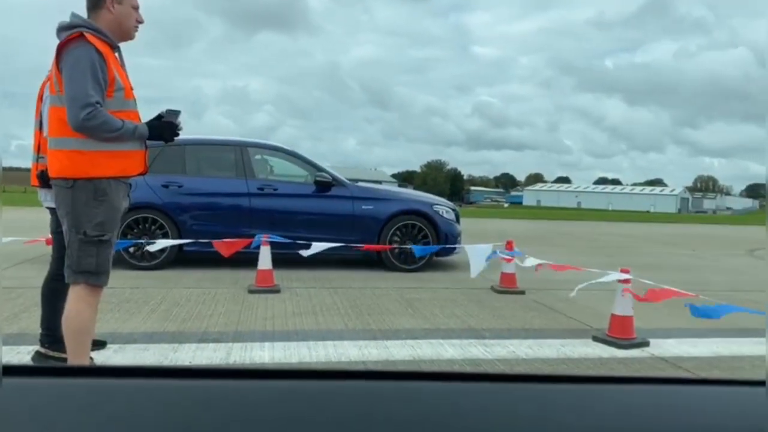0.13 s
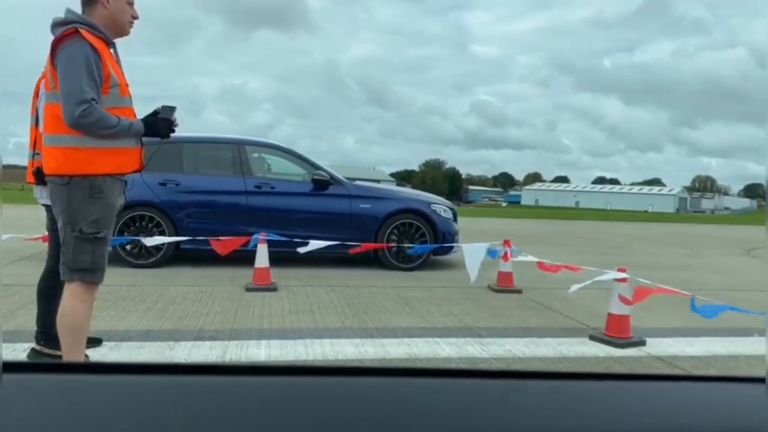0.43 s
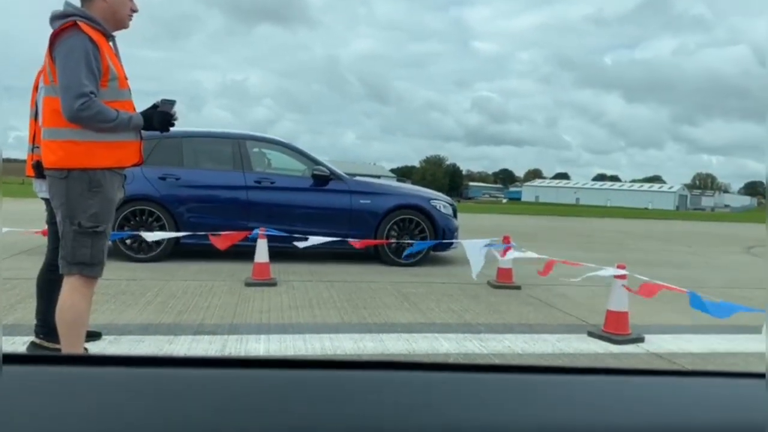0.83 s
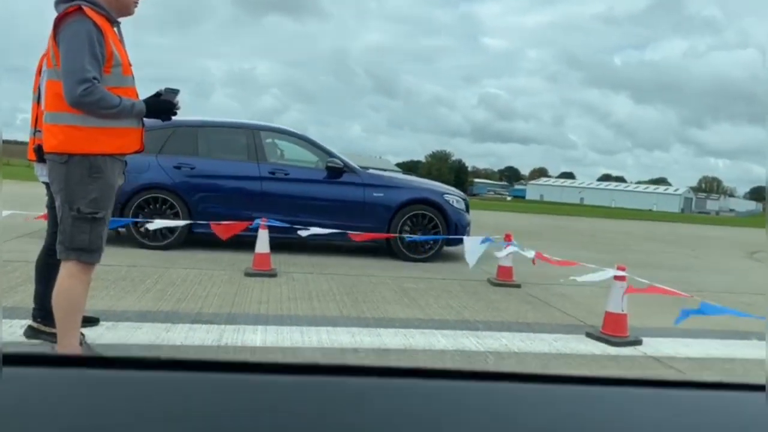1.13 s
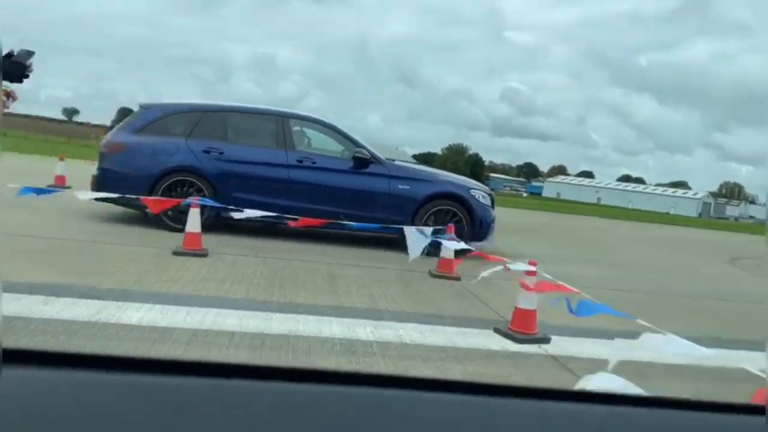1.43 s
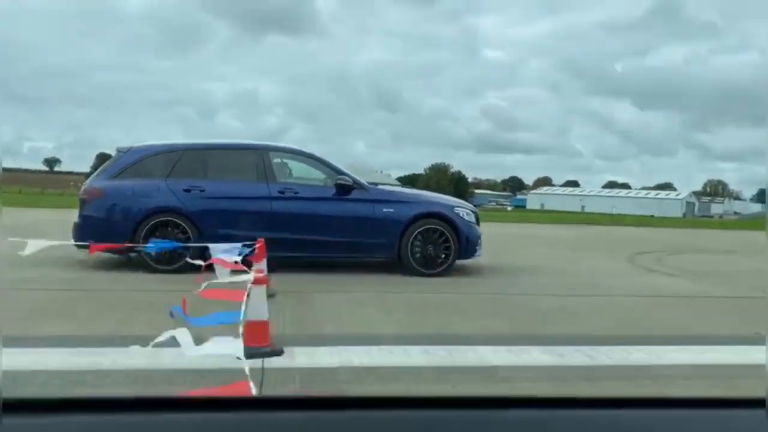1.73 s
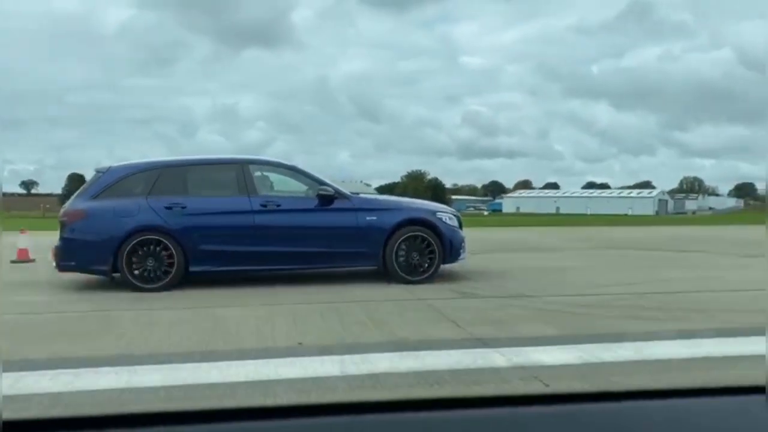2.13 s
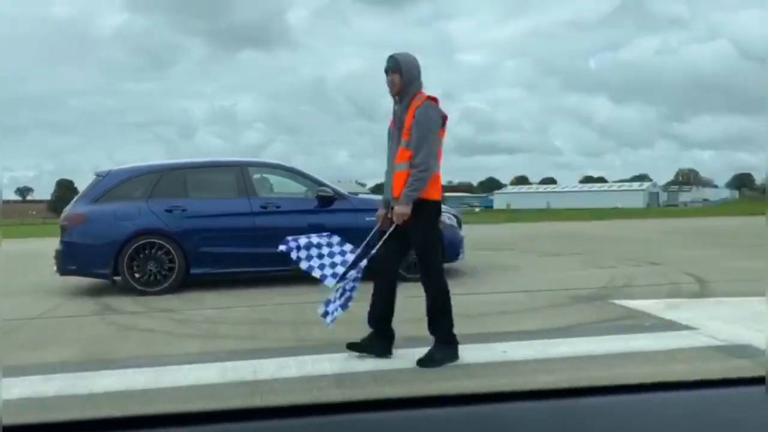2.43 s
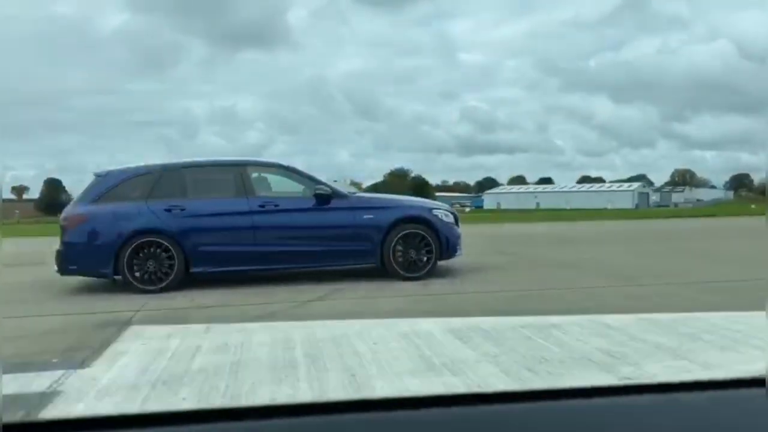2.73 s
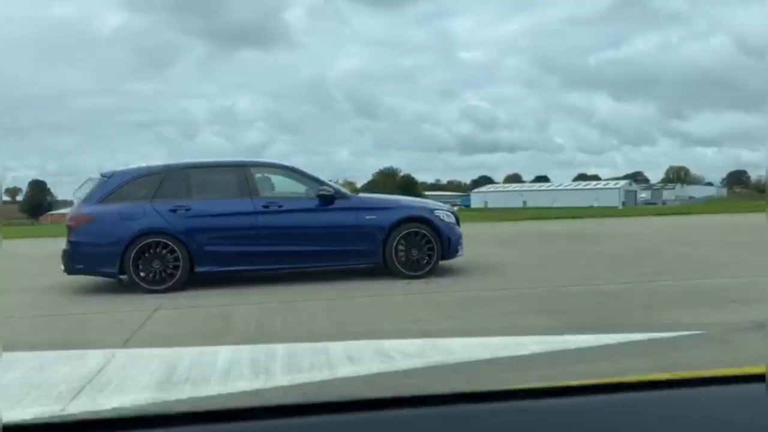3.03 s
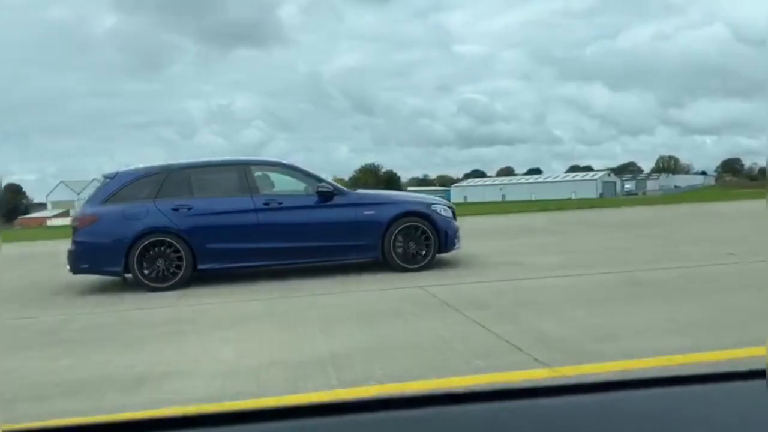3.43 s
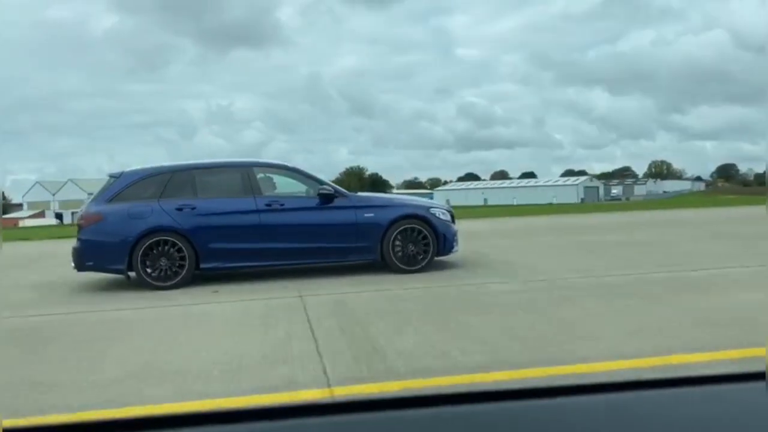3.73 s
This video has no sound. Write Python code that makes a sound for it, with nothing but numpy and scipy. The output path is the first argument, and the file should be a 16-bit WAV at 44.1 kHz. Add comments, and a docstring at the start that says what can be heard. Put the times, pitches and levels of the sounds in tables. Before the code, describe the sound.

Car engine held at growling revs launches with a scrape and bump, then screams up through a shift

```python
"""First a six-cylinder engine held against the brake; then the car pulls away, revs out and shifts up.
The engine is a stack of sines on half multiples of the crank rate, with exhaust noise pulsing at the firings.
Under the surge something loose scrapes through the cabin and bumps to a stop: noise and ringing modes.
The body heaves once as a sagging sine boom; short noise bursts make the trim tick.
Road rumble, tyre roar and wind are shaped noises that come up after the pull-away."""
import sys
import numpy as np
from scipy import signal
from scipy.fft import rfft, irfft, next_fast_len
from scipy.io import wavfile

SR = 44100
rng = np.random.default_rng(int(sys.argv[2]) if len(sys.argv) > 2 else 0)


def generate_wav(sig):
    """Save sig (samples, or channels by samples) to the path in sys.argv[1] as 16-bit PCM at SR."""
    pcm = np.round(np.clip(np.atleast_2d(sig).T, -1, 1) * 32767).astype(np.int16)
    wavfile.write(sys.argv[1], SR, pcm)


N = 170667
TIME = np.arange(N) / SR

# Noise spectra below are densities before their level curves.
# Left-right likeness of the noises: (frequency [Hz], correlation [-1 to 1])
LIKENESS = [(150, 1), (300, 0.21), (600, 0.035)]
# Random unevenness that roughens the noise band by band
PATCH_SPREAD_DB, PATCH_RATE_HZ, PATCH_SPACING_HZ = 4, 12, 130
# Early reflections
ECHO_GAIN, ECHO_SPAN_S = .3, .018

# Road rumble through the body: (frequency [Hz], density [dB per Hz])
RUMBLE_SPECTRUM = [(30, -45), (65, -39), (115, -39.5), (190, -49.5), (300, -51.5), (450, -58.5), (800, -89)]
# Rumble swell: (time [s], level [dB])
RUMBLE_LEVEL = [(0, -19), (.85, -19.5), (1.04, -2.5), (1.2, -4), (1.36, 5.5), (1.47, 0), (1.7, -4.5),
                (1.92, 4), (2.25, 2), (2.9, 4.5), (3.3, 0.5), (3.87, 1.5)]
# Tyre roar: (frequency [Hz], density [dB per Hz])
ROAR_SPECTRUM = [(200, -55), (310, -51), (450, -64), (620, -72), (1050, -62.5), (1400, -90), (4000, -89),
                 (6500, -99), (10500, -109)]
# Roar swell: (time [s], level [dB])
ROAR_LEVEL = [(.9, -29.5), (1.3, -5), (1.75, -8.5), (2.4, -5.5), (2.75, -1.5), (3.1, -2.5), (3.87, -7)]
# Wind round the body, once the car is fast: (frequency [Hz], density [dB per Hz])
WIND_SPECTRUM = [(850, -65.5), (1100, -62.5), (2200, -85), (4000, -102)]
# Wind swell: (time [s], level [dB])
WIND_LEVEL = [(1.9, -28), (2.42, -6), (2.65, 0), (3.05, -6.5), (3.5, -5.5), (3.87, 2)]

# Trim ticks: (time [s], level [dB])
TICKS = [(0.353, -19), (0.402, -14), (1.018, -2.5), (1.995, -7), (2.514, -2), (2.669, 1.5), (2.69, -9.5),
         (2.748, -10), (2.869, -9), (3.072, -8), (3.732, -7.5)]
# Bright noise heard in a tick, with a notch near 8.3 kHz: (frequency [Hz], density [dB per Hz])
TICK_SPECTRUM = [(1100, -66), (2300, -73), (6800, -77.5), (8300, -98.5), (10200, -83.5), (12000, -99)]
TICK_ATTACK_S, TICK_T60_S = .004, 0.066

# The body's falling boom
HEAVE_S, HEAVE_DB, HEAVE_ATTACK_S, HEAVE_T60_S = 1.508, -8, 0.023, 0.68
HEAVE_START_HZ, HEAVE_SAG_HZ_PER_S = 84.3, 560

# Modes of the loose object: (frequency [Hz], width [Hz], level before the ring gain [dB])
OBJECT_MODES = [(152, 43, -6), (434, 39, -0.5), (774, 44, -21), (1020, 210, -1), (1128, 15, -13),
                (1654, 49, -25), (1850, 18, -15.5), (3123, 35, -15.5)]
# Bright noise heard in the scrape, with a notch near 8.3 kHz: (frequency [Hz], density [dB per Hz])
SCRAPE_SPECTRUM = [(400, -65.5), (900, -61), (1700, -67), (2500, -69), (6700, -74.5), (8300, -93.5),
                   (10200, -73.5), (12000, -98)]
# Surges of the scrape: (time [s], level [dB])
SCRAPE_LEVEL = [(.86, -37), (.94, -19), (1.09, -13), (1.146, -1), (1.18, -5.5), (1.225, 0.5), (1.26, -10.5),
                (1.37, -8), (1.42, -23.5), (1.455, -5), (1.5, -22), (1.7, -36.5)]
SCRAPE_GRAIN_DB, GRAIN_RATE_HZ = 2.5, 130
SCRAPE_PEAK_DB = 0.5  # height of each resonance added to a flat gain of 1
SLIPS_PER_S, SLIP_DB, SLIP_T60_S = 150, -4, 0.025
# Knocks, then a run of contacts: (time [s], level [dB], low-pass cutoff [Hz])
BUMPS = [(1.141, -13, 1800), (1.203, -9.5, 3480), (1.332, -13, 8970), (1.347, -3, 9000), (1.354, 0, 2480),
         (1.361, 3, 8000), (1.37, -14, 10000), (1.382, -7, 2000)]
# Noise of a contact before its low-pass: (frequency [Hz], density [dB per Hz])
BUMP_SPECTRUM = [(50, -41.5), (150, -31.5), (300, -39), (480, -37.5), (700, -46), (1100, -44.5),
                 (1600, -55), (6500, -60.5), (10200, -63.5), (12000, -76)]
BUMP_ATTACK_S, BUMP_T60_S, BUMP_RING_DB = 0.0026, 0.079, -13.5

# Engine course: (time [s], crank speed [rpm], crank shake [dB], firing note [dB], its octave [dB])
ENGINE = [(0.0, 1648, -12, -31, -47), (0.1, 1797, -58.5, -18.5, -22), (0.25, 2200, -36, -15, -30),
          (0.5, 2432, -34, -14.5, -35.5), (0.75, 2733, -42, -13, -29.5), (1.0, 2849, -35.5, -19, -27.5),
          (1.28, 2939, -42, -25.5, -30.5), (1.47, 2835, -35, -34.5, -48), (1.6, 3110, -47.5, -32, -25.5),
          (1.78, 3540, -35.5, -23.5, -23), (1.9, 3882, -29, -12.5, -36), (2.07, 4680, -35, -29, -34.5),
          (2.2, 5120, -34.5, -18.5, -32), (2.28, 5354, -17.5, -26.5, -20), (2.4, 5870, -19.5, -23, -19.5),
          (2.52, 6246, -20, -24, -27.5), (2.66, 6545, -23.5, -26.5, -28.5), (2.78, 6186, -23.5, -24, -26),
          (2.9, 5688, -18.5, -25, -16.5), (3.04, 4975, -25.5, -20.5, -32),
          (3.16, 5560, -20.5, -24.5, -14.5), (3.29, 5643, -18, -25.5, -21), (3.48, 6033, -22, -21, -19.5),
          (3.87, 6640, -25.5, -30.5, -26.5)]
CYLINDERS = 6
# Beat of one cylinder bank: (time [s], level [dB])
BANK_BEAT = [(0, -44), (.6, -24), (1.2, -29.5), (2.2, -23.5), (3.87, -26.5)]
# Engine load, driving the higher orders and the rush: (time [s], level [dB])
LOAD = [(0, -12.5), (.25, -2), (1.15, 1.5), (1.35, -3), (2.3, 0.5), (3.87, 1.5)]
# Exhaust and cabin resonances on the higher orders: (frequency [Hz], level before load [dB])
PIPE = [(110, -29.5), (200, -33.5), (340, -39), (420, -46.5), (510, -34.5), (570, -24), (635, -37.5),
        (720, -29.5), (810, -31.5), (900, -48.5), (1020, -38), (1300, -54.5), (1450, -42), (1700, -59.5)]
# Strong overtones: (multiple of crank rate [1], offset held on the brake [dB], offset at high revs [dB])
OVERTONES = [(4.5, -6.5, -0.5), (8, -9, -5.5), (9, -5.5, 0.5), (12, 2, -5.5), (15, 0, -12.5),
             (18, -13, -15)]
HELD_RPM, HIGH_RPM = 2720, 4370
WEAK_DB, WEAK_FALL_DB_PER_ORDER = -5.5, 1.19  # the other orders come from unequal cylinders
STRONG_WAVER_DB, WEAK_WAVER_DB, WAVER_RATE_HZ = 1.52, 4, 15
WAVER_RISE = 0.68  # extra share of strong waver at high revs
CRANK_JITTER_TURNS, JITTER_RATE_HZ = 0.003, 25
# Left side against right: (frequency [Hz], phase lead [radians], extra level [dB])
LEAD = [(130, 0.09, 0), (227, 0.64, 1), (284, 0.18, 6), (580, -1.79, -2.5), (800, -0.71, 0)]
# Gas rushing in the exhaust: (frequency [Hz], density [dB per Hz])
RUSH_SPECTRUM = [(42, -65.5), (125, -56), (200, -57.5), (430, -64), (600, -59), (770, -62), (940, -95.5),
                 (1600, -87.5), (3400, -110), (11000, -130)]
RUSH_PULSING = 0.43  # depth of the swing at the firing rate

CEILING, CUTOFF_HZ, FADE_S = 0.78, 11400, .004


def from_db(db):
    """Decibels to gain."""
    return 10 ** (np.asarray(db) / 20)


def in_time(rows):
    """Each column of a curve, sample by sample."""
    s, *columns = np.transpose(rows)
    return [np.interp(TIME, s, column) for column in columns]


def at_hz(points, hz):
    """A spectrum read on a log-frequency axis."""
    f, value = np.transpose(points)
    return np.interp(np.log(hz), np.log(f), value)


def drift(rate_hz):
    """Smooth random wander with spread 1: low-passed noise, drawn at every 40th sample."""
    pole = np.exp(-80 * np.pi * rate_hz / SR)
    raw = rng.standard_normal(N // 40 + 2002)
    slow = signal.lfilter([1], [1, -2 * pole, pole * pole], raw)[2000:]  # skip the settling
    return np.interp(np.arange(N) / 40, np.arange(len(slow)), slow / slow.std())


def noise(spectrum, lift=lambda hz: 1):
    """Steady stereo noise of a given density, alike on both sides in the bass; lift adds resonances."""
    size = next_fast_len(N)
    hz = np.maximum(np.fft.rfftfreq(size, 1 / SR), 1)
    mid, side = rfft(rng.standard_normal((2, size)))
    alike = np.clip(at_hz(LIKENESS, hz), -.98, .98)
    both = np.sqrt(1 + alike) * mid + np.sqrt(1 - alike) * side * [[1], [-1]]
    low_skirt = 1 + (spectrum[0][0] / hz) ** 6
    high_skirt = 1 + (hz / spectrum[-1][0] / 2) ** 8
    gain = lift(hz) * from_db(at_hz(spectrum, hz)) / np.sqrt(low_skirt * high_skirt)
    return irfft(both * gain, size)[:, :N] * np.sqrt(SR) / 2


def blow(s, attack_s, t60_s):
    """A straight rise, then an exponential decay."""
    age = TIME - s
    decay = np.clip((age - attack_s) / t60_s, 0, 10)
    return np.clip(age / attack_s, 0, 1) * np.exp(-np.log(1000) * decay)


def patchy(x, stop=26):
    """Random unevenness, about 12 Hz, that roughens the noise band by band from about 1 to 3.3 kHz."""
    size = next_fast_len(N)
    place = np.fft.rfftfreq(size, 1 / SR) / PATCH_SPACING_HZ
    spectrum, out = rfft(x, size), x.copy()
    for k in range(8, stop):
        triangle = np.maximum(1 - abs(place - k), 0)
        band = irfft(spectrum * triangle, size)[:, :N]
        out += band * (from_db(PATCH_SPREAD_DB * drift(PATCH_RATE_HZ)) - 1)
    return out


def cabin(x, count=12):
    """Early reflections from glass and trim colour a sound inside the car."""
    out = x.copy()
    for side in range(len(x)):
        lags = rng.uniform(ECHO_SPAN_S / 10, ECHO_SPAN_S, count) * SR
        signs = rng.choice([-1, 1], count)
        for lag, sign in zip(lags, signs):
            gain = sign * ECHO_GAIN * np.exp(-lag / SR / ECHO_SPAN_S)
            out[side, int(lag):] += gain * x[side, :-int(lag)]
    return out / np.sqrt(1 + count * ECHO_GAIN ** 2 / 2)


def road(rumble_waver_db=0.37, roar_waver_db=1.0, gust_db=2):
    """Rumble and tyre roar with slight random unevenness, and gusting wind."""
    rumble = noise(RUMBLE_SPECTRUM) * from_db(in_time(RUMBLE_LEVEL)[0] + rumble_waver_db * drift(33))
    roar = noise(ROAR_SPECTRUM) * from_db(in_time(ROAR_LEVEL)[0] + roar_waver_db * drift(10))
    wind = noise(WIND_SPECTRUM) * from_db(in_time(WIND_LEVEL)[0] + gust_db * drift(29))
    return rumble + patchy(roar + wind)


def trim():
    """Short dry ticks of plastic: bursts of shaped noise."""
    strokes = sum(from_db(db) * blow(s, TICK_ATTACK_S, TICK_T60_S) for s, db in TICKS)
    return noise(TICK_SPECTRUM) * strokes


def heave():
    """The body's one deep boom: a sine that sags to half its starting pitch."""
    sagging_hz = HEAVE_START_HZ - HEAVE_SAG_HZ_PER_S * (TIME - HEAVE_S)
    hz = np.clip(sagging_hz, HEAVE_START_HZ / 2, HEAVE_START_HZ)
    turns = np.cumsum(hz * (TIME > HEAVE_S)) / SR
    swell = blow(HEAVE_S, HEAVE_ATTACK_S, HEAVE_T60_S)
    return from_db(HEAVE_DB) * swell * np.sin(2 * np.pi * turns)


def object_modes(hz):
    """Gain of the loose object: an equal resonant peak at each of its modes."""
    peaks = sum(1 / (1 + (2 * (hz - f) / width) ** 2) for f, width, db in OBJECT_MODES)
    return 1 + from_db(SCRAPE_PEAK_DB) * peaks


def slide():
    """A scrape that comes in surges: grainy friction and small slips, both through the object's modes."""
    slips = (rng.random(N) < SLIPS_PER_S / SR) * rng.uniform(0.17, 1.2, N)
    decay = from_db(-60 / (SLIP_T60_S * SR))
    slips = signal.lfilter([1], [1, -decay], slips + 1e-18)  # tiny offset keeps the filter fast
    friction = from_db(SCRAPE_GRAIN_DB * drift(GRAIN_RATE_HZ)) / 2
    motion = friction + from_db(SLIP_DB) * slips
    return noise(SCRAPE_SPECTRUM, object_modes) * motion * from_db(in_time(SCRAPE_LEVEL)[0])


def bump(crackle_db=2):
    """Separate knocks, then a quick run of crunching contacts; each also rings the object's modes."""
    crunch, ring = np.zeros((2, N)), np.zeros((2, N))
    age = TIME[:SR // 4]
    for s, db, dull_hz in BUMPS:
        soft = signal.butter(1, dull_hz, fs=SR)
        contact = noise(BUMP_SPECTRUM) * blow(s, BUMP_ATTACK_S, BUMP_T60_S)
        crunch += from_db(db) * signal.lfilter(*soft, contact + 1e-18)
        start = int(s * SR)
        for hz, width, mode_db in OBJECT_MODES:
            # the sides ring less in step where the noises are less alike
            phase = (1 - at_hz(LIKENESS, hz)) * rng.standard_normal((2, 1))
            tone = np.sin(2 * np.pi * hz * age + phase) * np.exp(-np.pi * width * age)
            ring[:, start:start + len(age)] += from_db(db + mode_db + BUMP_RING_DB) * tone
    return crunch * from_db(crackle_db * drift(GRAIN_RATE_HZ)) + ring


def engine():
    """Half multiples of the crank rate sound, set by firing, load and pipe; gas rushes with each firing."""
    rpm, shake_db, firing_db, octave_db = in_time(ENGINE)
    bank_db, = in_time(BANK_BEAT)
    load_db, = in_time(LOAD)
    turns = np.cumsum(rpm / 60) / SR + CRANK_JITTER_TURNS * drift(JITTER_RATE_HZ)
    revved = np.clip((rpm - HELD_RPM) / (HIGH_RPM - HELD_RPM), 0, 1)
    firing = CYLINDERS / 2  # firings per crank turn
    low = {firing / 2: bank_db, 2: shake_db, firing: firing_db, 2 * firing: octave_db}
    strong = {order: held_db + (high_db - held_db) * revved for order, held_db, high_db in OVERTONES}
    lead = [(f, radians) for f, radians, db in LEAD]
    balance = [(f, db) for f, radians, db in LEAD]
    sides = np.array([[.5], [-.5]])
    tones = np.zeros((2, N))
    for order in np.arange(1, 22, .5):
        hz = order * rpm / 60
        if order in low:
            db = low[order]
        else:
            weak_db = WEAK_DB - WEAK_FALL_DB_PER_ORDER * order
            db = load_db + at_hz(PIPE, hz) + strong.get(order, weak_db)
        waver_db = WEAK_WAVER_DB
        if order in low or order in strong:
            waver_db = STRONG_WAVER_DB * (1 + WAVER_RISE * revved)
        phase = 2 * np.pi * (order * turns + rng.random()) + at_hz(lead, hz) * sides
        level_db = db + waver_db * drift(WAVER_RATE_HZ) + at_hz(balance, hz) * sides
        tones += np.sqrt(2) * from_db(level_db) * np.sin(phase)
    puffs = 1 + RUSH_PULSING * np.cos(2 * np.pi * firing * turns)
    return tones + noise(RUSH_SPECTRUM) * puffs * from_db(load_db)


def scene():
    """All layers together; only the slide gets the early reflections."""
    loose = bump() + cabin(patchy(slide()))
    return road() + trim() + heave() + loose + engine()


def record(dry):
    """Peaks are rounded, the top is cut, the ends are eased."""
    rounded = dry / (1 + (dry / CEILING) ** 8) ** (1 / 8)
    cut = signal.ellip(10, .1, 80, CUTOFF_HZ, fs=SR, output="sos")
    ends = np.minimum(np.minimum(TIME, TIME[::-1]) / FADE_S, 1)
    return ends * signal.sosfilt(cut, rounded)


dry = scene()
out = record(dry)
generate_wav(out)
```